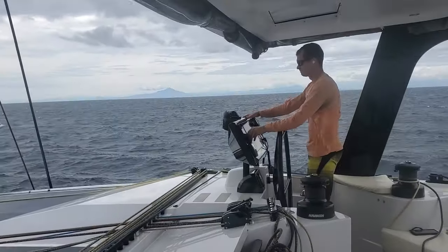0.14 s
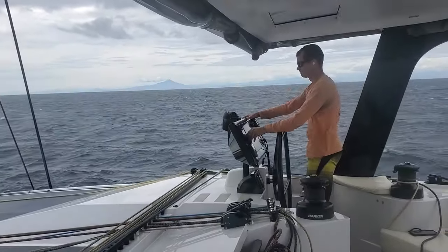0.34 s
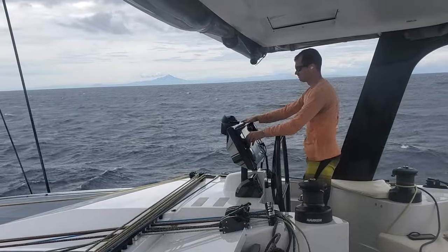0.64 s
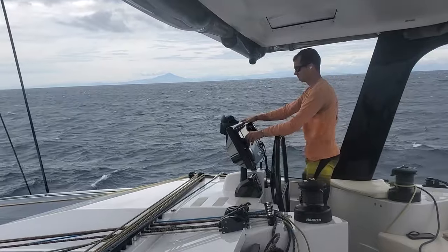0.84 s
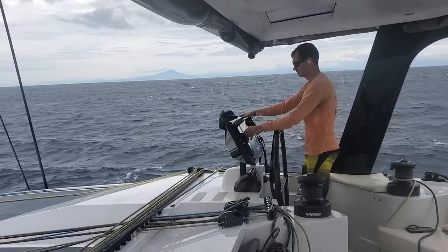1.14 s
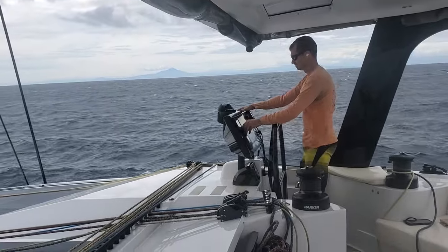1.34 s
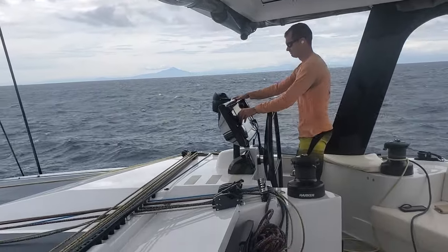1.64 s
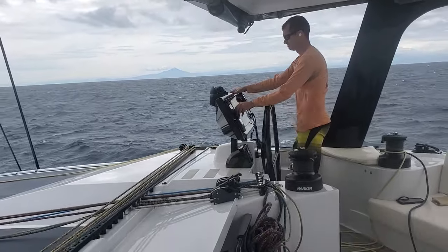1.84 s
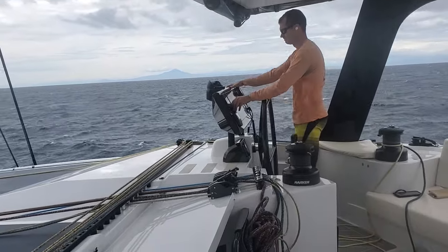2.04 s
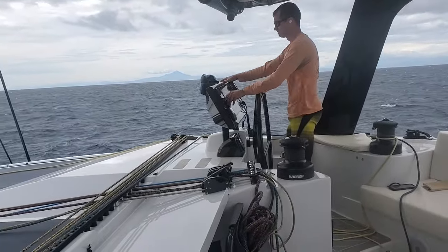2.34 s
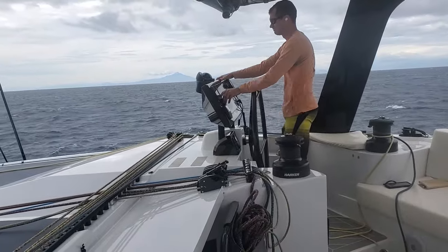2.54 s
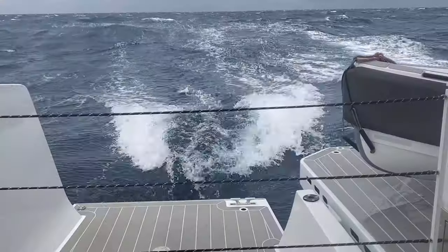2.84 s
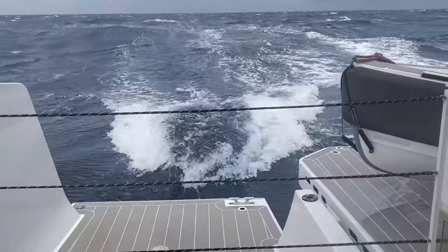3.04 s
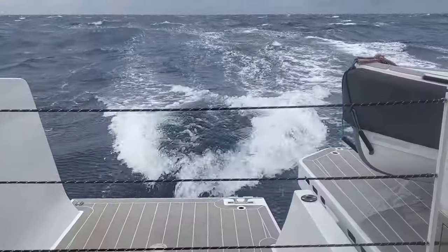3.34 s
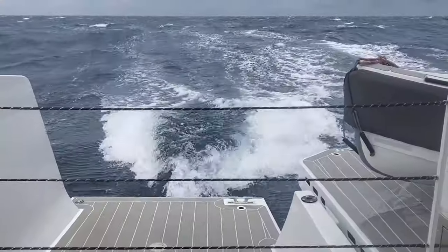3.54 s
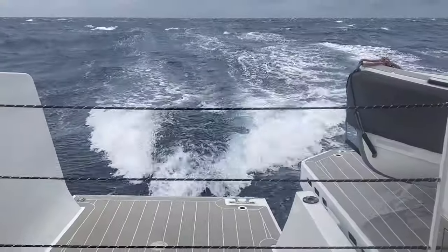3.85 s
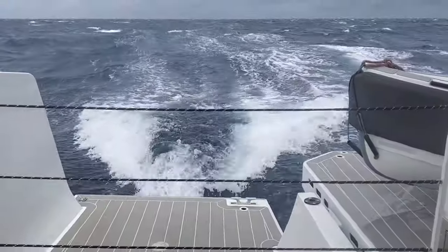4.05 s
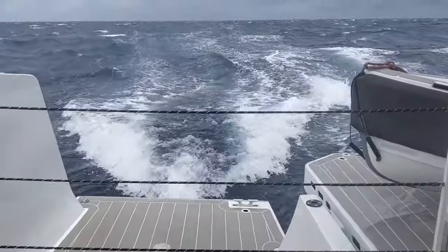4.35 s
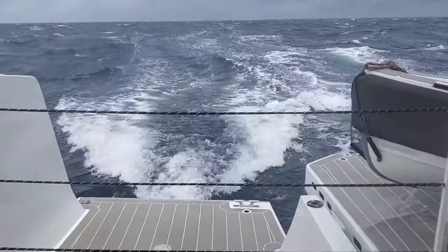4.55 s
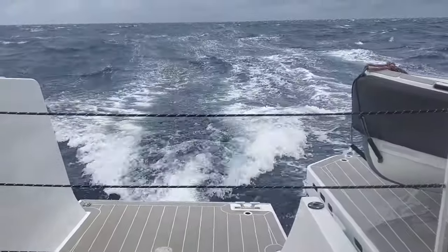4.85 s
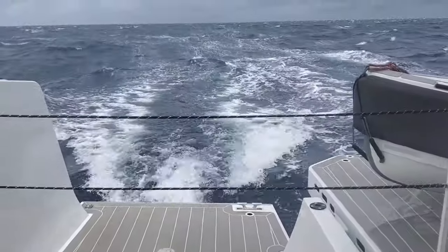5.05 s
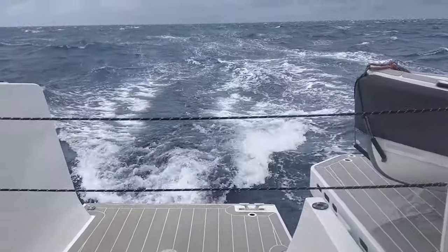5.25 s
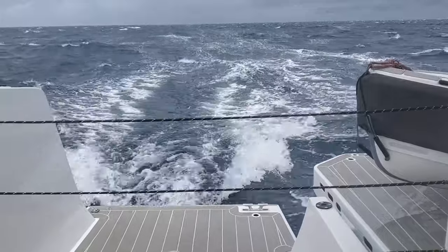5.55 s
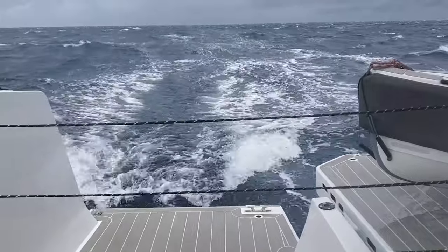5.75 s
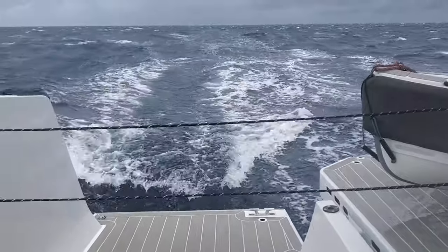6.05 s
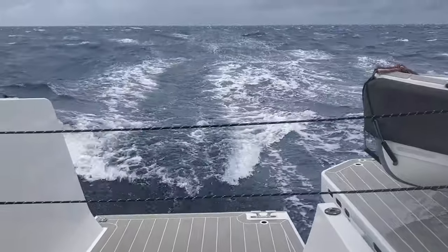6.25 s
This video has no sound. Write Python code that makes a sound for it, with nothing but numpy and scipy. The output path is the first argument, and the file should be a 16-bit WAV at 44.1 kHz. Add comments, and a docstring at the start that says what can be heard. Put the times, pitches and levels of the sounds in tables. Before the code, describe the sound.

Two windy places aboard a sailing boat. First the helm: constant low wind roar, tearing flutter and short knocks, with sea hiss and small wave washes behind. Then a hard cut to the stern, opening with a loud thump; wide, splashy wake water hisses and bubbles close by, surging slightly, while irregular clusters of dull gusts overload the handheld microphone until the end.

```python
"""Wind rumbles and flutters on two microphone ports at the helm of a catamaran in a gale, over sea hiss.
Then, at once, the stern: a wake churns and fizzes close by while gusts thump hollowly on the microphone.
Wind is noise shaped by spectra, bursts and gust envelopes, with hard eddies as short bands of noise.
Water is hiss with random drops, lit in passing bands; the wake adds resonances and ringing bubbles."""
import sys
import numpy as np
from scipy import signal
from scipy.fft import rfft, irfft
from scipy.io import wavfile
from scipy.ndimage import uniform_filter1d

SR = 44100
rng = np.random.default_rng(int(sys.argv[2]) if len(sys.argv) > 2 else 0)


def master_out(mix):
    """Clip the mix to full scale and print it as 16-bit PCM to the path in sys.argv[1]."""
    frames = np.transpose(np.atleast_2d(mix))
    ceiling = np.clip(frames, -1, 1)
    pcm = np.round(ceiling * 32767).astype(np.int16)
    wavfile.write(sys.argv[1], SR, pcm)


N = 281786
TIME = np.arange(N) / SR  # s
FREQ = np.fft.rfftfreq(N, 1 / SR)  # Hz
MOVE_S = 2.9135  # the helm gives way to the stern

# Gusts at the microphone: start_s, length_s, buffeting_db, rumble_db, rumble_left_minus_right_db
GUSTS = [(0.0, 0.14, -30.5, -30.5, 2), (0.099, 0.031, -30.5, -33, 5), (0.236, 0.13, -29, -32, -3),
         (0.4, 0.03, -27.5, -40, 0), (0.454, 0.034, -30, -34, -4), (0.693, 0.022, -28, -29, -5),
         (0.814, 0.16, -35, -34, 5), (1, 0.089, -30.5, -47, -2), (1.045, 0.21, -34, -34.5, 12.5),
         (1.307, 0.17, -33, -33, 3), (1.595, 0.12, -32, -32.5, 7), (1.848, 0.12, -33.5, -36, 15),
         (1.952, 0.24, -31, -37, 8), (2.19, 0.33, -28, -31, 4), (2.452, 0.035, -40, -28, 0),
         (2.545, 0.25, -29.5, -33, 1), (2.834, 0.26, -28.5, -31, 3), (2.9, 0.012, -38, -31, 4),
         (3.1, 0.093, -35, -40.5, -11), (3.351, 0.073, -29, -29.5, -5), (3.46, 0.13, -28, -32, -5),
         (3.591, 0.06, -21.5, -38, -15), (3.724, 0.057, -22, -29.5, -3), (3.796, 0.05, -38, -26, -5),
         (3.93, 0.2, -35, -36, -7), (4.403, 0.075, -23, -32, -7), (4.498, .02, -29, -30, -4),
         (4.57, 0.21, -34, -32, 0), (4.9, 0.036, -32, -28, -4), (4.972, 0.076, -28, -26.5, -1),
         (5.109, 0.037, -29.5, -27.5, -1), (5.206, 0.043, -28, -34, 0), (5.321, 0.12, -30.5, -33, -5),
         (5.52, 0.23, -30, -37, 5), (5.821, 0.1, -26, -34, 10), (5.92, 0.045, -23, -29.5, -14),
         (5.987, 0.071, -30.5, -35, -14), (6.11, 0.15, -30.5, -35.5, -7), (6.343, 0.021, -30, -45, 6)]
GUST_RISE_S, GUST_FALL_S = 0.023, 0.027
# Wind that keeps blowing between the gusts: buffeting_db, left_rumble_db, right_rumble_db
HELM_BREEZE = (-33, -30, -41)
STERN_BREEZE = (-36.5, -49, -36.5)
# Spectra of wind pressure, relative density: frequency_hz, density_db
HELM_RUMBLE_SPECTRUM = [(15, -17), (32, -11), (55, -1.5), (90, -1), (135, -1.5), (210, -5), (330, -12.5),
                        (550, -20), (1200, -80), (4000, -83)]
STERN_RUMBLE_SPECTRUM = [(15, -17), (32, -12), (55, -4), (88, -1), (135, -6), (200, -7.5), (400, -17),
                         (1500, -68)]
FLUTTER_SPECTRUM = [(40, -37), (180, -10), (320, 2), (440, 1.5), (570, -3), (760, 2), (1150, -4.5),
                    (1600, -10), (2300, -18), (4000, -24.5), (7000, -31.5), (16000, -48)]
BUFFET_SPECTRUM = [(50, -38), (170, -14.5), (260, -6), (350, -2), (440, -1), (540, -7.5), (700, -11),
                   (1100, -18), (1800, -39), (4000, -60), (16000, -80)]
# Single hard eddies: peak_s, length_s, peak_db, centre_hz, left_minus_right_db
HARD_EDDIES = [(0.058, 0.0063, -22.5, 780, 1), (0.077, 0.016, -32, 105, 5), (0.134, 0.012, -27.5, 80, 12),
               (0.278, 0.004, -18, 760, -3), (0.283, 0.012, -34, 89, 4), (0.296, 0.0061, -23, 260, 7),
               (0.341, 0.005, -24, 205, -1), (0.399, 0.0047, -21.5, 760, -3), (0.405, 0.005, -23, 220, 1),
               (0.431, 0.0045, -23, 765, 1), (0.474, 0.005, -20, 225, 4), (0.479, 0.012, -30, 85, 0),
               (0.623, 0.004, -27, 740, -1), (0.698, 0.005, -25.0, 208, 6), (0.725, 0.013, -29, 90, 0),
               (0.849, 0.023, -28.5, 86, 8), (0.855, 0.005, -34, 205, -7), (0.891, 0.006, -28.5, 213, 7),
               (0.962, 0.0064, -27.5, 240, 8), (1.005, 0.012, -33, 87, 0), (1.063, 0.0052, -21.5, 750, -1),
               (1.075, 0.012, -28, 102, 18), (1.145, 0.005, -26, 259, 6), (1.191, 0.004, -25, 790, -11),
               (1.268, 0.012, -35, 85, 19), (1.429, 0.004, -27, 800, 6), (1.608, 0.0047, -25.5, 900, -7),
               (1.619, 0.005, -32, 235, 9), (1.648, 0.004, -24, 710, -4), (1.739, 0.005, -23.5, 210, -3),
               (1.948, 0.004, -20, 666, -9), (2.058, 0.004, -24.0, 740, 2), (2.064, 0.005, -27, 305, -2),
               (2.086, 0.005, -22, 237, 4), (2.166, 0.005, -24.5, 219, 14), (2.221, 0.004, -22.0, 680, 0),
               (2.255, 0.004, -25, 686, -2), (2.256, 0.012, -22.5, 90, 4), (2.264, 0.005, -23, 223, 9),
               (2.362, 0.0047, -22.5, 726, -5), (2.381, 0.012, -25, 90.5, 1), (2.385, 0.0054, -28, 200, -5),
               (2.451, 0.0045, -30, 816, -2), (2.461, 0.005, -19, 217, -4), (2.466, 0.012, -19, 85, -3),
               (2.664, 0.004, -33, 805, -11), (2.673, 0.0044, -31, 785, 2), (2.779, 0.005, -30, 278, 3),
               (2.887, 0.0066, -23.5, 235, 2), (2.919, 0.012, -26, 74.5, -4),
               (2.975, 0.0087, -21.0, 423, -3), (2.99, 0.013, -31, 90, -3), (2.994, 0.0046, -25, 405, -11),
               (3.039, 0.003, -5.5, 440, 3), (3.057, 0.0043, -16.5, 495, -1), (3.062, 0.012, -28, 85, -2),
               (3.112, 0.003, -18.5, 525, 3), (3.197, 0.0054, -22.5, 410, 6),
               (3.198, 0.014, -26.5, 90.5, 2), (3.394, 0.0063, -12, 360, 3), (3.405, 0.0075, -23, 464, 4),
               (3.431, 0.013, -26, 80, -4), (3.506, 0.003, -21.5, 405, -2), (3.535, 0.0041, -21.5, 485, -4),
               (3.549, 0.003, -23, 474, -10), (3.584, 0.006, -26, 405, 3), (3.604, 0.003, -21.5, 430, 11),
               (3.625, 0.0041, -20, 460, -16), (3.635, 0.012, -32, 79.5, -16), (3.642, 0.003, -22, 440, -4),
               (3.651, 0.011, -24, 410, -7), (3.693, 0.003, -20, 385, 0), (3.715, 0.0032, -16.5, 360, -3),
               (3.718, 0.012, -22, 80, -1), (3.729, 0.0084, -26, 435, 13), (3.749, 0.004, -18.5, 445, 3),
               (3.768, 0.0042, -16, 415, -7), (3.783, 0.0034, -17.5, 355, 3), (3.812, 0.012, -25, 79, -6),
               (3.822, 0.0052, -20, 305, -1), (3.833, 0.0039, -21.5, 447, -6), (4.03, 0.0037, -26, 435, -5),
               (4.122, 0.003, -24.5, 390, -4), (4.391, 0.0037, -15.5, 336, -2),
               (4.413, 0.0048, -15, 427, -1), (4.436, 0.003, -21, 373, 5), (4.451, 0.0041, -19, 410, 0),
               (4.463, 0.0048, -16, 447, -4), (4.492, 0.0059, -21.5, 505, 2), (4.504, 0.0035, -15, 426, -1),
               (4.597, 0.0078, -24, 385, 2), (4.687, 0.0047, -22.5, 335, -3), (4.916, 0.0037, -17, 415, -3),
               (5.013, 0.014, -21.5, 85, -2), (5.027, 0.0033, -16.5, 510, -4), (5.062, 0.012, -31, 80, -10),
               (5.095, 0.0047, -16.5, 398, 0), (5.133, 0.003, -19.5, 433, -7),
               (5.142, 0.0057, -22.5, 400, 1), (5.231, 0.0034, -18.5, 460, 4), (5.391, 0.016, -20, 90, 0),
               (5.392, 0.0035, -19.5, 298, 2), (5.456, 0.0053, -27, 380, 3), (5.554, 0.003, -21.5, 405, -2),
               (5.602, 0.003, -24, 455, -11), (5.852, 0.012, -29, 85, 4), (5.858, 0.003, -21.5, 330, 1),
               (5.873, 0.0059, -26, 460, -5), (5.921, 0.003, -24, 475, 10), (5.935, 0.003, -21.5, 433, 3),
               (5.962, 0.003, -23, 470, 7), (5.983, 0.003, -29, 473, -12), (6, 0.0034, -23.5, 470, 9),
               (6.035, 0.0051, -14.5, 373, -5), (6.244, 0.013, -27.5, 85, -7), (6.28, 0.0039, -20, 420, -3)]
# An eddy swells over a share of its length, or over a least number of cycles
EDDY_RISE_SHARE, EDDY_LEAST_CYCLES = 0.936, 1.36
# Power share common to both ports for the deepest eddies, and the frequency where it halves
BOTH_PORTS_SHARE, BOTH_PORTS_HALF_HZ = 0.58, 680
# Smaller eddies an octave higher: level before the tilt, and spread in natural-log frequency
EDDY_TEAR_DB, EDDY_TEAR_SPREAD = -15, 0.25
EDDY_TILT_DB_PER_OCTAVE = -6.5
HELM_EDDY_SPREAD, STERN_EDDY_SPREAD = 0.25, 0.25  # in natural-log frequency

# Level at which the wake is heard; it surges, and dips briefly after hard thumps: time_s, level_db
WAKE_HEARD_LEVEL = [(2.93, -26.5), (3.05, -26.5), (3.1, -29), (3.16, -25.5), (3.42, -26.5), (3.64, -29),
                    (3.79, -30), (3.86, -28), (4.0, -30), (4.2, -32), (4.43, -32.5), (4.66, -30),
                    (5.2, -31), (5.38, -29.5), (6.0, -31), (6.07, -33.5), (6.15, -31), (6.39, -31.5)]
# Spectra of wake water and foam, relative density: frequency_hz, density_db
CHURN_SPECTRUM = [(60, -36), (200, -3.5), (400, 12.5), (650, 6.5), (880, 1.5), (1400, 4.5), (2000, 0),
                  (3000, 1.5), (4500, -3.5), (9000, -53)]
FOAM_SPECTRUM = [(500, -44), (2000, -4.5), (3200, -2), (4300, 2.8), (5700, 3.5), (10000, -2), (13000, 2.5),
                 (16000, -5.5)]
# Broad resonances of the hollow stern, alike at both ports: centre_hz, width_hz, peak_db
HOLLOW_RESONANCES = [(1092, 190, 8), (1692, 97, 5.5), (2270, 400, -1.5), (3780, 160, 4)]
# Water against foam at the usual heard level, and dB gained for each dB that this level rises
CHURN_DB, WAKE_USUAL_DB, CHURN_GROWTH = -7, -32.5, 0.028
# Part of the wake that comes straight from one hull: frequency_hz, coherence (0 to 1)
HULL_COHERENCE = [(400, 0.11), (1500, 0.3), (3000, 0.23), (6000, 0.086), (10000, .08)]
HULL_LAG_S = 0.000782  # its delay at the right port
# Likeness of the rest of the foam at the two ports: frequency_hz, correlation (-1 to 1)
FOAM_CORRELATION = [(1000, 0.25), (2400, 0.088), (3300, -0.097), (6000, -0.058), (8000, -0.41),
                    (10200, 0.023)]

# Waves that wash along the hull below the helm: start_s, length_s, level_db
WAVES = [(.262, 0.1, -36), (.72, .03, -41), (.85, 0.037, -33.5), (1.05, 0.2, -34), (1.83, 0.11, -33.5),
         (2.06, 0.42, -36.5)]
WAVE_RISE_S, WAVE_FALL_S, OPEN_SEA_DB = 0.026, 0.068, -38
# Hiss of the whitecaps: time_s, level_db
WHITECAP_LEVEL = [(0, -41.5), (.2, -42.5), (.38, -41.5), (.75, -40.5), (1.05, -42), (1.45, -45.5),
                  (1.75, -42), (2.9, -42)]
# Spectra of the sea, relative density: frequency_hz, density_db
SEA_RUSH_SPECTRUM = [(100, -20), (700, 13), (1500, 5.5), (2500, 5.5), (4000, 0.5), (6000, -8.5),
                     (10000, -20), (16000, -11)]
SEA_HISS_SPECTRUM = [(1000, -20), (4000, 5.5), (6000, 2), (10000, -7), (13000, 6.5), (16000, -9.5)]

# Microphone response, with a deep notch in the treble: frequency_hz, gain_db
MICROPHONE_RESPONSE = [(5600, -1), (6200, -3.5), (6800, -12), (7350, -20.5), (7750, -40), (8300, -20),
                       (9100, -11.5), (9900, -2.5), (11200, 1), (12500, 0.5), (15900, 3)]
# Difference between the two ports: frequency_hz, left_minus_right_db
PORT_BALANCE = [(5200, 0.45), (6000, -1), (6700, 0), (12300, 0), (14300, 2), (16000, -1)]
BAND_EDGE_HZ = 15850


def helm_wind():
    """Turbulent pressure in open wind: rumble mostly on the left port, a tearing flutter on both."""
    low = rumble(HELM_BREEZE, HELM_RUMBLE_SPECTRUM, lumpy_db=2.0, left_swing_db=3.0, right_swing_db=20.5)
    flutter = turbulence(FLUTTER_SPECTRUM, burst_hz=86.4, shared_db=3.0, own_db=1.5)
    flutter = patchy(flutter, depth_db=2.0, width_hz=670, length_s=0.016)
    flutter = steady(flutter, size=1700)
    flutter = buffeting(flutter, HELM_BREEZE, edge_hz=680, full_db=-24.5, brightening=0.12)
    return low + flutter * sides(-3.3)


def stern_wind():
    """Turbulent pressure in broken gusts: whirls with their own colours thump on the microphone."""
    low = rumble(STERN_BREEZE, STERN_RUMBLE_SPECTRUM, lumpy_db=-0.5, left_swing_db=7, right_swing_db=7)
    buffet = turbulence(BUFFET_SPECTRUM, burst_hz=63.3, shared_db=3.0, own_db=2.5)
    buffet = patchy(buffet, depth_db=2.0, width_hz=300, length_s=0.018)
    buffet = steady(buffet, size=1700)
    buffet = buffeting(buffet, STERN_BREEZE, edge_hz=1500, full_db=-28, brightening=0.2)
    return low + buffet * sides(-0.47)


def rumble(breeze, spectrum, lumpy_db, left_swing_db, right_swing_db):
    """Large-eddy loading: gust power adds to breeze power at each port, and the pressure swings."""
    pressure = turbulence(spectrum, burst_hz=44.0, shared_db=3.0, own_db=lumpy_db)
    gust_power = []
    for side in (.5, -.5):
        rows = [(start, length, db + side * pan_db) for start, length, _, db, pan_db in GUSTS]
        gust_power.append(swells(rows, GUST_RISE_S, GUST_FALL_S))
    swing_db = np.array([[left_swing_db], [right_swing_db]]) * np.tanh(wander(14.5, channels=2))
    swing = steady(gain_of(swing_db), size=6000)
    breeze_power = gain_of(breeze[1:])[:, None] ** 2
    return pressure * swing * np.sqrt(breeze_power + np.array(gust_power))


def buffeting(pressure, breeze, edge_hz, full_db, brightening):
    """Wind-driven pressure: gust power adds to the breeze; the harder it blows, the brighter it tears."""
    gust_power = swells([row[:3] for row in GUSTS], GUST_RISE_S, GUST_FALL_S)
    wind = np.sqrt(gain_of(breeze[0]) ** 2 + gust_power)
    body = irfft(rfft(pressure) / (1 + (FREQ / edge_hz) ** 6), N)
    treble = pressure - body
    return wind * (body + treble * (wind / gain_of(full_db)) ** brightening)


def turbulence(spectrum, burst_hz, shared_db, own_db):
    """Incoherent pressure at two ports, coming in bursts that are partly shared between them."""
    bursts = gain_of(shared_db * wander(burst_hz) + own_db * wander(burst_hz, channels=2))
    return steady(colour(rng.standard_normal((2, N)) * bursts, spectrum), size=1900)


def hard_eddies():
    """Eddy impact: a short band of noise swells and dies; deeper eddies are more alike at both ports."""
    out, t = np.zeros((2, N)), TIME[:8192]
    hz = np.fft.rfftfreq(len(t), 1 / SR) + 1
    for peak_s, length_s, db, centre_hz, pan_db in HARD_EDDIES:
        rise_s = max(EDDY_RISE_SHARE * length_s, EDDY_LEAST_CYCLES / centre_hz)
        swell = (t / rise_s * np.exp(1 - t / rise_s)) ** 2  # peaks at 1 after rise_s
        shared = BOTH_PORTS_SHARE / (1 + (centre_hz / BOTH_PORTS_HALF_HZ) ** 2)
        noise = rng.standard_normal((3, len(t)))
        ports = np.sqrt(shared) * noise[0] + np.sqrt(1 - shared) * noise[1:]
        spread = HELM_EDDY_SPREAD if peak_s < MOVE_S else STERN_EDDY_SPREAD
        above = np.log(hz / centre_hz)
        main = np.exp(-.5 * (above / spread) ** 2)
        tear = gain_of(EDDY_TEAR_DB) * np.exp(-.5 * ((above - np.log(2)) / EDDY_TEAR_SPREAD) ** 2)
        tilt = gain_of(EDDY_TILT_DB_PER_OCTAVE * np.log2(hz / centre_hz))
        pressure = irfft(rfft(ports) * (main + tear) * tilt, len(t))
        pressure = steady(pressure, size=round(SR / centre_hz))  # over about a cycle
        add(out, peak_s - rise_s, gain_of(db) * sides(pan_db) * swell * pressure)
    return out


def wake():
    """Water folding over behind the hulls: fizzing foam above churn, hollow resonance and bubbles."""
    fizz = spray(drops_per_s=2200, size_db=-1.5, drop_share=0.34, flicker_db=0.0)
    fizz = patchy(from_side(fizz), depth_db=2.0, width_hz=900, length_s=0.026)
    foam = evened(colour(fizz, FOAM_SPECTRUM))
    slosh = spray(drops_per_s=900, size_db=5, drop_share=0.15, flicker_db=1.0)
    slosh = patchy(from_side(slosh), depth_db=2.0, width_hz=780, length_s=0.028)
    churn = evened(colour(slosh, CHURN_SPECTRUM))
    ringing = bubbles(per_s=380, cycles=13.9, size_db=4.5)
    water = gain_of(4.5) * churn + gain_of(-4.0) * hollow_stern() + gain_of(-4.0) * ringing
    heard_level = follow(WAKE_HEARD_LEVEL)
    growth = (heard_level / gain_of(WAKE_USUAL_DB)) ** CHURN_GROWTH
    splashes = splashing(per_s=70, fall_s=.004, depth=.55)
    return heard_level * splashes * (foam + gain_of(CHURN_DB) * growth * water)


def hollow_stern():
    """Cavity resonance: patchy noise passes through broad peaks, identical at both ports."""
    surges = patchy(rng.standard_normal((1, N)), depth_db=1.5, width_hz=310, length_s=0.026)
    response = sum(gain_of(db) / (1 + (2 * (FREQ - hz) / width) ** 2) for hz, width, db in HOLLOW_RESONANCES)
    return evened(irfft(rfft(surges) * response, N))


def bubbles(per_s, cycles, size_db, count=36):
    """Bubble resonance: bubbles of many sizes ring briefly, rising a little in pitch."""
    out, t = np.zeros((2, N)), TIME[:SR // 25]
    for hz in np.geomspace(900, 6000, count):
        age = hz * t / cycles
        phase = 2 * np.pi * hz * t * (1 + 0.0258 * np.minimum(age, 5))
        ring = np.sin(phase) * np.exp(-age)
        births = (rng.random((2, N)) < per_s / count / SR).astype(float)
        sizes = np.minimum(rng.exponential(1, int(births.sum())), 4)
        births[births > 0] = gain_of(size_db * sizes)
        out += signal.oaconvolve(births, ring[None], axes=1)[:, :N]
    return evened(out)


def from_side(x):
    """Interaural coherence: part of the wake reaches the right port late from one hull, the rest from around."""
    delay = np.exp(-2j * np.pi * FREQ * HULL_LAG_S)
    direct = np.interp(FREQ, *np.transpose(HULL_COHERENCE)) * delay
    likeness = direct + np.interp(FREQ, *np.transpose(FOAM_CORRELATION))
    unlike = np.sqrt(np.maximum(1 - abs(likeness) ** 2, 0))
    left, right = rfft(x)
    return np.array([x[0], irfft(likeness * left + unlike * right, N)])


def helm_sea():
    """Superposed splashes: waves rush along the hull and whitecaps hiss behind the wind."""
    waves = spray(drops_per_s=1000, size_db=3.5, drop_share=0.42, flicker_db=2.5)
    waves = patchy(waves, depth_db=2.0, width_hz=370, length_s=0.02)
    sea = np.sqrt(gain_of(OPEN_SEA_DB) ** 2 + swells(WAVES, WAVE_RISE_S, WAVE_FALL_S))
    rush = sea * evened(colour(waves, SEA_RUSH_SPECTRUM))
    foam = spray(drops_per_s=2200, size_db=3, drop_share=0.22, flicker_db=.6)
    foam = patchy(foam, depth_db=2.5, width_hz=550, length_s=0.021)
    hiss = follow(WHITECAP_LEVEL) * evened(colour(foam, SEA_HISS_SPECTRUM))
    return (rush + hiss) * splashing(per_s=83, fall_s=0.0023, depth=0.41)


def spray(drops_per_s, size_db, drop_share, flicker_db):
    """Shot noise: countless tiny bursts merge into hiss, with single drops of varied size among them."""
    sizes = gain_of(size_db * np.minimum(rng.exponential(1, (2, N)), 4))
    drops = sizes * rng.choice([-1, 1], (2, N)) * (rng.random((2, N)) < drops_per_s / SR)
    merged = rng.standard_normal((2, N))
    hiss = np.sqrt(drop_share) * evened(drops) + np.sqrt(1 - drop_share) * merged
    return hiss * gain_of(flicker_db * wander(49))


def splashing(per_s, fall_s, depth):
    """Exponential decay: small splashes start suddenly and soon die, at an even overall level."""
    landings = rng.exponential(1, N) * (rng.random(N) < per_s / SR)
    power = signal.lfilter([1], [1, -np.exp(-1 / (fall_s * SR))], landings)
    return steady(np.sqrt(1 + depth * power), size=3000)


def patchy(x, depth_db, width_hz, length_s):
    """Time-frequency modulation: single splashes and whirls each light up their own band for a moment."""
    hz, t, z = signal.stft(x, SR, nperseg=256, noverlap=192)
    across = np.fft.fftfreq(len(hz), hz[1])[:, None] * width_hz
    along = np.fft.fftfreq(len(t), t[1]) * length_s
    blur = np.exp(-2 * (across ** 2 + along ** 2))
    patches = np.fft.ifft2(np.fft.fft2(rng.standard_normal(z.shape[1:])) * blur).real
    lit = z * gain_of(depth_db * evened(patches))
    return signal.istft(lit, SR, nperseg=256, noverlap=192)[1][:, :N]


def swells(rows, rise_s, fall_s):
    """Addition of powers: events (start_s, length_s, level_db) each build up, hold and die away."""
    t, power = TIME[::64], 0
    for start, length, db in rows:
        attack = np.clip((t - start) / rise_s + .5, 0, 1)
        release = np.exp(-np.maximum(t - start - length, 0) / fall_s)
        power = power + (gain_of(db) * attack * release) ** 2
    return np.interp(TIME, t, power)


def wander(rate_hz, channels=1):
    """Low-pass noise: smooth chance of rms 1, fading out around the rate."""
    noise = rng.standard_normal((channels, N))
    return evened(irfft(rfft(noise) * np.exp(-(FREQ / rate_hz) ** 2), N))


def colour(x, points):
    """Linear filtering: a gain curve in dB drawn on a log-frequency axis."""
    hz, db = np.transpose(points)
    return irfft(rfft(x) * gain_of(np.interp(np.log(FREQ + 1), np.log(hz), db)), N)


def steady(x, size):
    """Level normalization: holds local rms near 1 over about size samples and keeps the faster grain."""
    power = uniform_filter1d(uniform_filter1d(x ** 2, size, axis=-1), size, axis=-1)
    return x / np.sqrt(abs(power) + 1e-12)


def evened(x):
    """Power normalization: scales to an overall rms of 1."""
    return x / np.sqrt(np.mean(x ** 2) + 1e-20)


def follow(rows):
    """Level interpolation: a dB curve in time as a gain per sample."""
    return gain_of(np.interp(TIME, *np.transpose(rows)))


def sides(balance_db):
    """Level difference: left and right gains, half the dB to each."""
    return gain_of(np.array([[.5], [-.5]]) * balance_db)


def gain_of(db):
    """Logarithmic level: decibels to amplitude."""
    return 10 ** (np.asarray(db) / 20)


def add(mix, start_s, sound):
    """Superposition: mixes a stereo sound in at a time."""
    part = mix[:, max(round(start_s * SR), 0):][:, :sound.shape[1]]
    part += sound[:, :part.shape[1]]


def scene():
    """Superposition of sources: the helm, then at once the stern; hard eddies strike in both places."""
    helm = helm_wind() + helm_sea()
    stern = stern_wind() + wake()
    return np.where(TIME < MOVE_S, helm, stern) + hard_eddies()


def record(dry):
    """Transduction: soft saturation, port balance, microphone colour, faint self-noise and band limit."""
    rounded = dry / (1 + (dry / .6) ** 4) ** .25  # amplitude stays below 0.6
    balance_db = np.interp(FREQ, *np.transpose(PORT_BALANCE))
    ports = irfft(rfft(rounded) * sides(balance_db), N)
    self_noise = gain_of(-53.5) * rng.standard_normal((2, N))
    heard = colour(ports, MICROPHONE_RESPONSE) + self_noise
    low_pass = signal.firwin(611, BAND_EDGE_HZ, window=("kaiser", 8), fs=SR)
    return signal.oaconvolve(heard, low_pass[None], "same")


dry = scene()
out = record(dry)
master_out(out)
```